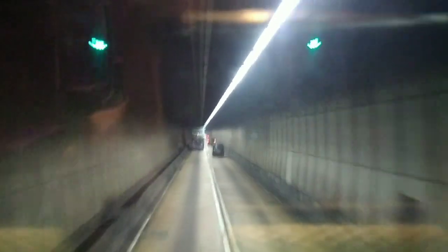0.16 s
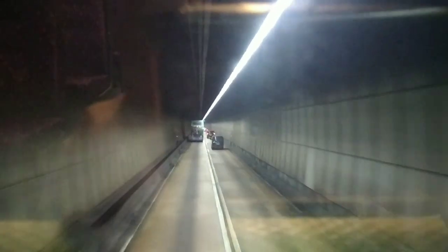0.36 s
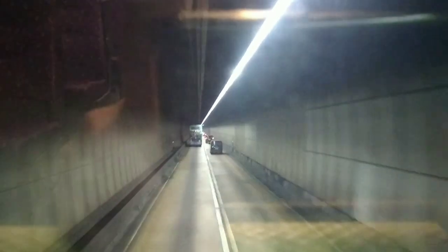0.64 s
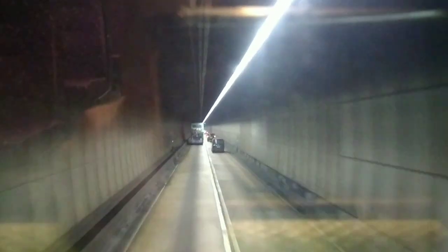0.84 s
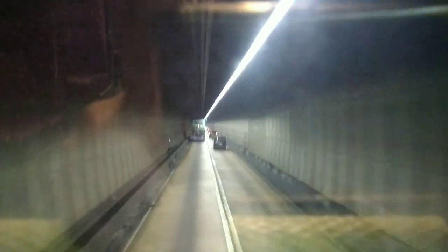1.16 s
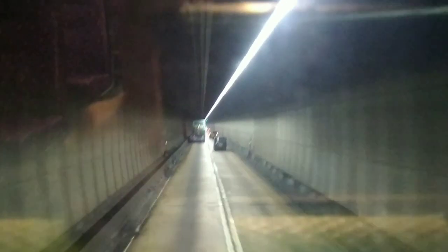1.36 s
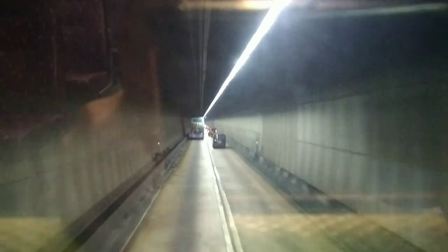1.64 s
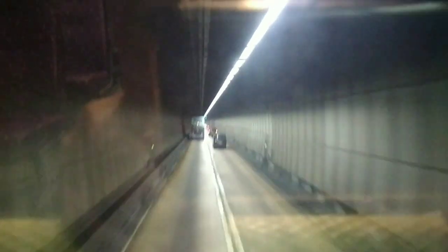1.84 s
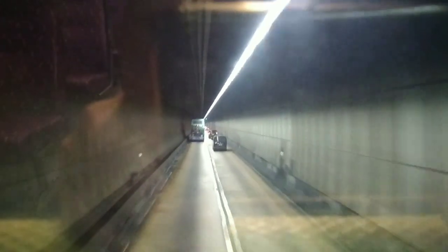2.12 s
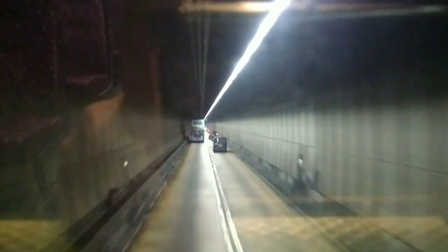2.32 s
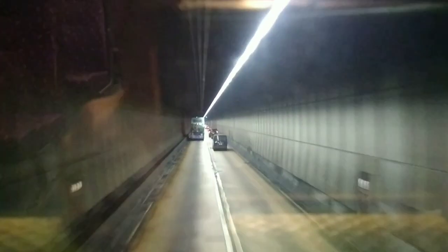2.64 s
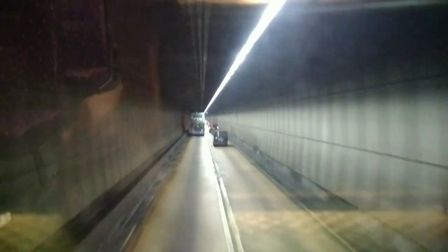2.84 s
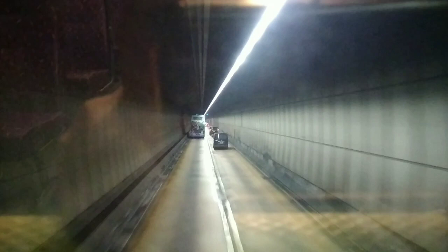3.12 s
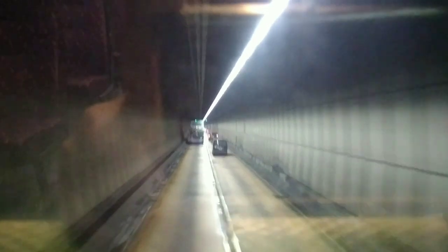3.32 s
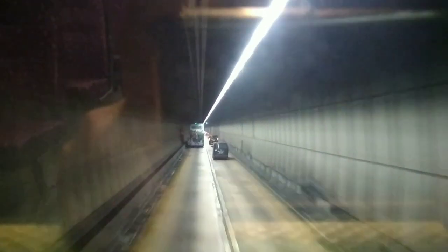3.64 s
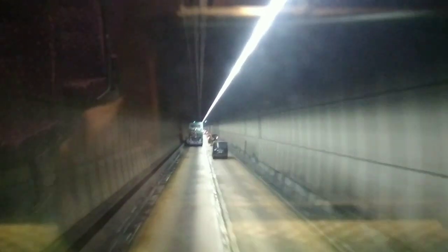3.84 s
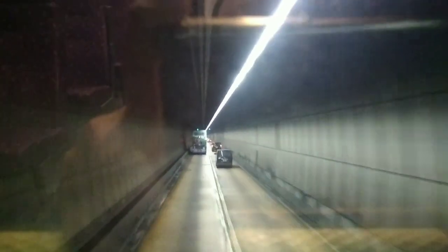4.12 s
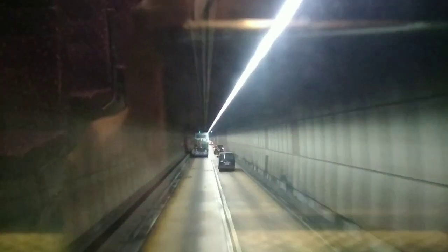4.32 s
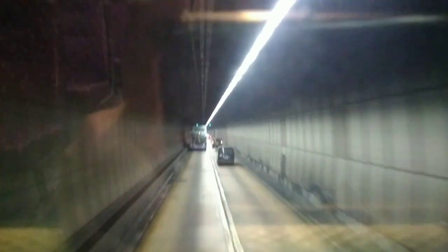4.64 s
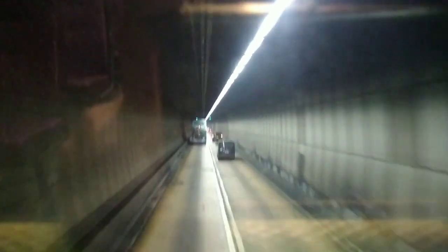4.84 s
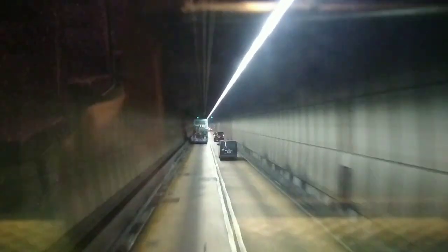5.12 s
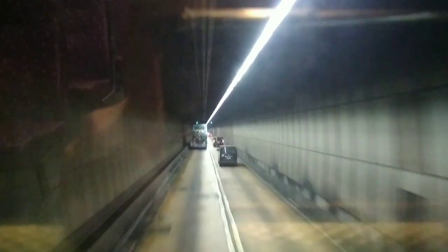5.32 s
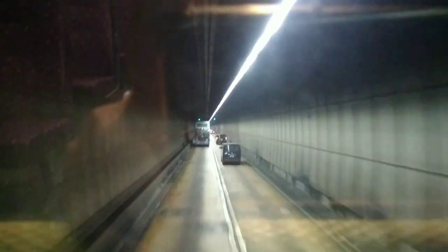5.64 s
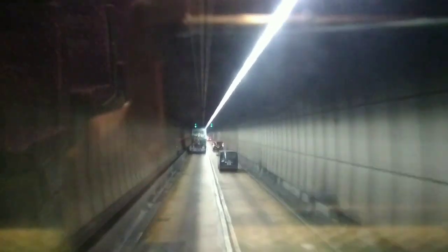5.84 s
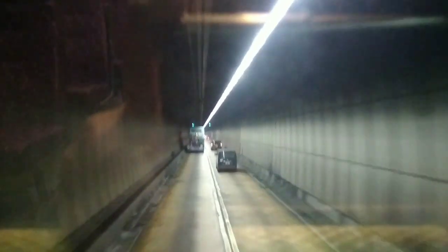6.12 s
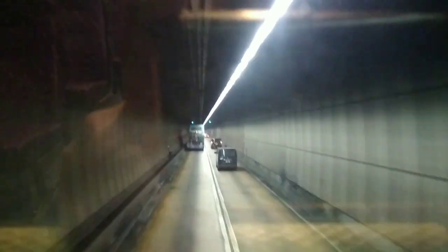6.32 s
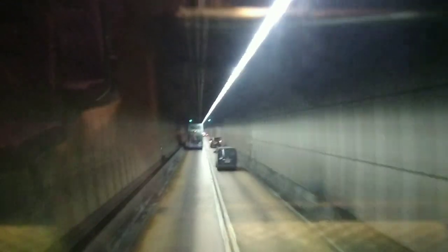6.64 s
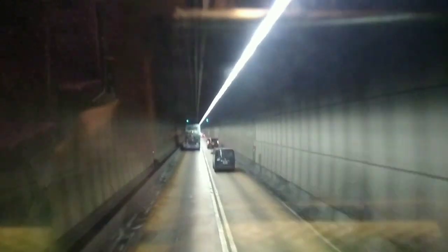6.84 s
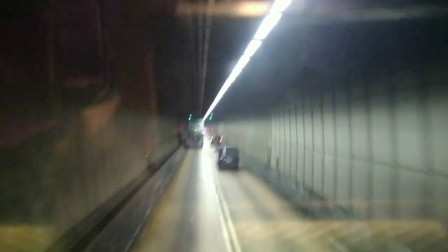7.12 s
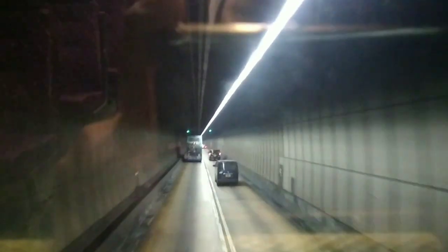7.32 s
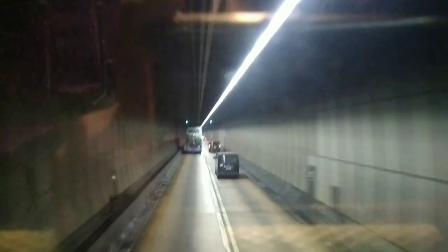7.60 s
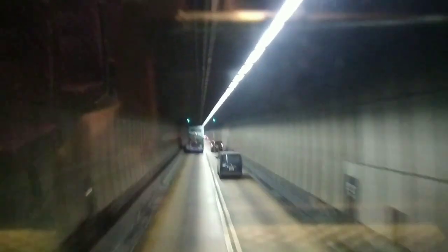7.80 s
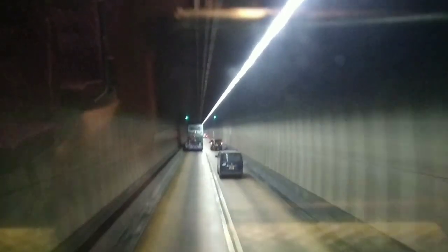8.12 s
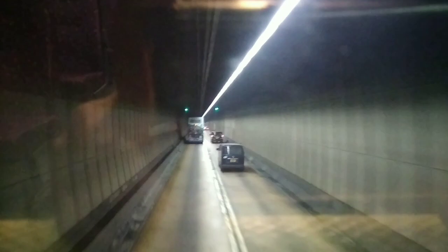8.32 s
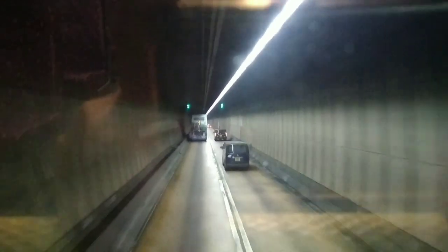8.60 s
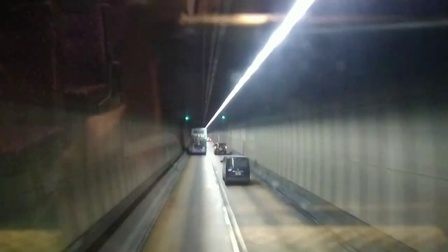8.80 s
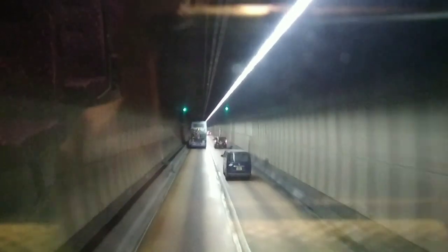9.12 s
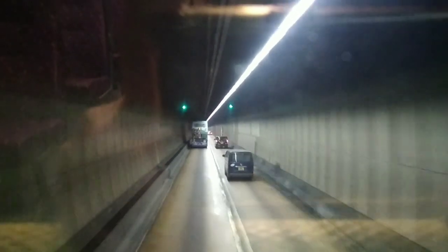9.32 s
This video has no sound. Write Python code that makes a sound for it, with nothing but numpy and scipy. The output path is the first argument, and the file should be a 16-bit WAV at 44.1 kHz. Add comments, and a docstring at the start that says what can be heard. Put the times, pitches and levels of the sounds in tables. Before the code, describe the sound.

Inside a bus driving through a tunnel, heard on a phone in the cabin. A heavy, uneven low rumble and drumming floor dominate, with steady tyre roar and soft air hiss. The low engine pulls at first, then eases off and sinks slightly while thin gear whine drifts in and out. Past the middle, a rough stretch swells the rumble and shakes the trim into a short hissing rattle with ticks and thumps, followed by a small metallic click.

```python
"""Inside a bus in a road tunnel: body sway and boom, drumming floor, tyre roar, air hiss, two steady low hums.
The engine pulls until 3.1 s, then eases off while gears whine; a loose catch clicks at 0.1 s.
From 4.6 s come brief tonal patches in the roar. At 6.3-7.0 s a rough stretch shakes the fittings into a
hissing rattle with ticks and thumps; the catch clicks again at 7.9 s. Shaped noise makes the road, rattle and
ticks, sines make engine, gears, hums and rings; a phone with two small ports hears it."""
import sys
import numpy as np
from scipy import signal
from scipy.fft import rfft, irfft
from scipy.io import wavfile
from scipy.ndimage import uniform_filter1d, minimum_filter1d

SR = 44100
rng = np.random.default_rng(int(sys.argv[2]) if len(sys.argv) > 2 else 0)


def store_wav(level_fs):
    """Save 16-bit WAV to argv[1]."""
    pcm = np.round(np.clip(np.atleast_2d(level_fs), -1, 1) * 32767)
    wavfile.write(sys.argv[1], SR, pcm.T.astype(np.int16))


N = 417186
TIME, FREQ = np.arange(N) / SR, np.arange(N // 2 + 1) * SR / N

# Source levels are dB re full scale ahead of the ports; noise spectra are relative.
# crankshaft speed: t/s, turns per second/Hz
SHAFT_SPEED = [(0, 30.92), (.6, 31.29), (1.4, 31.62), (2.2, 31.86), (3.1, 32.03), (3.8, 31.57),
               (4.6, 31.16), (5.6, 30.72), (7.7, 29.73), (8.6, 29.32), (9.46, 29.03)]
LIFT_OFF_S = 3.1  # the driver lifts off the throttle


def road():
    """Body sways, cabin booms, floor panels drum; tyre roar and air hiss come through the glass."""
    # spectra: f/Hz, level/dB
    sway_spectrum = [(4, -40), (8, -8), (11.5, 11), (16, 11), (21, -1), (27, -18), (36, -53)]
    boom_spectrum = [(18, -9.5), (25, 3.5), (31, -2.5), (36, -1), (41, -16), (50, -17), (70, -26)]
    drum_spectrum = [(30, -12), (48, 4.5), (70, -2), (95, 0), (118, -0.5), (143, -14), (165, -9),
                     (230, -10.5), (280, -19), (325, -13), (450, -17), (900, -35)]
    judder_spectrum = [(110, 3.5), (170, 5.5), (230, -2), (400, -6.5), (600, -7.5), (1200, -13.5)]
    roar_spectrum = [(150, -23.5), (330, -1.5), (450, -6.5), (600, 3), (740, -4), (900, -3.5), (1050, -9),
                     (1250, -13.5), (1520, -15.5), (1690, -12), (1860, -16.5), (2300, -15), (3500, -31),
                     (7000, -65)]
    air_spectrum = [(800, 4), (2000, -7), (3300, 3), (4300, 1), (6300, -3.5), (8000, -5.5), (10400, -10),
                    (13000, -13), (15500, -20)]
    # answers to the road: smooth level/dB, rough level when fully built up/dB, build-up/s, t60/s
    sway_ride = (-19, -5.5, 1, 1)
    boom_ride = (-24.5, -12.5, 0.8, 1.5)
    drum_ride = (-34, -27, 1.3, 0)
    judder_ride = (-56.5, -38, 0.5, 0.1)
    bump_rise_s, rumble_ceiling = .14, .85  # ceiling of the low rumble, full scale 1
    bump_boom_db, bump_judder_db = -22, -9  # re sway, re thud
    pull_drum_db, pull_judder_db = -37.5, -47.5  # added in power at full engine load
    tyres_db, air_db, roar_db_per_hz = -39.5, -45.5, .18  # last: per turn/s of the shaft above its mean

    heave, thud, load = jolts(1, bump_rise_s), jolts(2, bump_rise_s), throttle()
    sway = even(diffuse(sway_spectrum), .18) * ride(sway_ride, heave)
    boom = even(diffuse(boom_spectrum), .242) * ride(boom_ride, heave * undb(bump_boom_db))
    # soft saturation rounds off the largest low-frequency swings
    rumble = rumble_ceiling * np.tanh((sway + boom) / rumble_ceiling)

    drum_level = np.hypot(ride(drum_ride, thud), load * undb(pull_drum_db))
    drum = even(diffuse(drum_spectrum), .28) * drum_level
    judder_road = ride(judder_ride, thud * undb(bump_judder_db))
    judder = diffuse(judder_spectrum) * np.hypot(judder_road, load * undb(pull_judder_db))

    # road speed follows the shaft in this gear
    faster_hz = curve(SHAFT_SPEED) - curve(SHAFT_SPEED).mean()
    roar = diffuse(roar_spectrum) * undb(tyres_db + roar_db_per_hz * faster_hz + .5 * walk(10))
    air = diffuse(air_spectrum) * undb(air_db + .5 * walk(23))
    return rumble + drum + judder + roar + air


def fittings():
    """Trim and panels chatter in many tiny contacts, which the cabin smears into a hiss."""
    # rattle spectrum: f/Hz, level/dB
    rattle_spectrum = [(600, -28), (1400, 1.5), (2600, 3), (4000, 4), (6000, 3.5), (8000, 1), (10400, -1.5),
                       (13000, -4.5), (15500, -3.5)]
    # answer to the road: smooth level/dB, rough level when fully built up/dB, build-up/s, t60/s
    rattle_ride = (-62.5, -41.5, 0.05, 1.4)
    # knocks: t/s, level/dB, rise/s, ring f/Hz
    knocks = [(6.335, -41, 0.021, 12000), (6.345, -45, .018, 2600), (6.398, -38.5, 0.024, 5500),
              (6.512, -37.5, .03, 4200), (6.555, -39, .028, 4800), (6.603, -42, .022, 3200),
              (6.68, -42, .028, 10500), (6.742, -37.5, .022, 5800), (6.825, -37.5, 0.028, 6300),
              (6.905, -36, 0.026, 2400), (6.922, -36.5, 0.026, 5500), (7.038, -46, .02, 3600)]
    contacts_per_s, smear_s, bump_rise_s = 820, .008, .22
    flutter_db, flutter_hz = .6, 13  # spread and rate scale of the random surges

    hits = rng.random(N) < contacts_per_s / SR
    contacts = hits * undb(2 * rng.exponential(size=N))
    power = signal.lfilter([1], [1, -np.exp(-1 / (smear_s * SR))], contacts)
    chatter = np.sqrt(power / power.mean())
    rattle = diffuse(rattle_spectrum) * chatter * ride(rattle_ride, jolts(-1, bump_rise_s))
    out = rattle * undb(flutter_db * walk(flutter_hz))
    for start, db, rise, hz in knocks:
        # a harder jolt sets off a short flurry of contacts in one fitting
        b, a = signal.iirpeak(hz, 1.1, fs=SR)
        ring = signal.lfilter(b, a, rng.standard_normal((2, N)))
        out = out + ring / ring.std() * undb(db) * swell(start, rise)
    return out


def panels():
    """The hardest jolts knock single panels, which give a dull, unsteady ring."""
    # thumps: t/s, level before the soft onset/dB, t60/s, ring f/Hz
    thumps = [(.04, -16, .45, 58.5), (1.29, -14, 0.4, 41), (2.52, -26, .45, 134), (3.52, -25, 0.76, 99.1),
              (5.65, -21, .4, 58), (6.145, -22, 0.51, 101), (6.42, -25, .5, 112.3), (6.5, -33, 0.65, 306),
              (6.57, -28, 0.4, 204.6), (6.705, -27, .2, 395), (6.83, -34, 0.22, 305),
              (6.895, -26, 0.16, 170), (6.95, -20, .22, 62), (7.015, -26.5, 0.13, 345),
              (7.845, -19.5, 0.42, 79), (7.93, -28, 0.25, 200.3)]
    pitch_spread, onset_t60_s = .06, .042  # share of the pitch; time for a panel to give way fully
    out, unsteady = np.zeros(N), 1 + pitch_spread * walk(45)
    for start, db, t60, hz in thumps:
        phase = 2 * np.pi * (np.cumsum(hz * unsteady) / SR + rng.random())
        onset = (1 - fade(start, onset_t60_s)) ** 2
        out += undb(db) * fade(start, t60) * onset * np.sin(phase)
    return out


def ticks():
    """Hard trim parts snap together: broadband noise with an instant onset and a short decay."""
    # tick spectrum: f/Hz, level/dB
    tick_spectrum = [(1500, -10), (3000, 5), (6000, -6), (9000, 1), (11500, -3), (15000, -3)]
    # snaps: t/s, level/dB, t60/s
    snaps = [(6.341, -42, 0.075), (6.425, -42, 0.07), (6.539, -39, .04), (6.578, -37, .025),
             (6.828, -41, .05), (6.918, -35, 0.036), (6.939, -33, .04), (7.037, -34, 0.057)]
    return diffuse(tick_spectrum) * sum(undb(db) * fade(start, t60) for start, db, t60 in snaps)


def catch():
    """A small metal catch rings in damped modes; diffuse cabin reflections build up just after."""
    # clicks: t/s, relative level/dB
    clicks = [(0.114, -34.5), (7.9048, -27.5)]
    # modes: f/Hz, relative level/dB, t60/s
    modes = [(5870, 1.5, 0.014), (6340, -7, .07), (6730, -0.5, 0.011), (7400, -12, 0.018),
             (10800, -12, .04)]
    # reflection spectrum: f/Hz, level/dB
    cabin_spectrum = [(1200, -30), (2000, 1), (2500, 6), (4000, 4.5), (6000, 4), (8500, 1.5), (10400, 0),
                      (13000, -3), (15500, 4)]
    cabin_t60_s, build_t60_s, delay_s = .33, .015, .00086
    direct, echoes = np.zeros(N), np.zeros(N)
    for start, db in clicks:
        for hz, mode_db, t60 in modes:
            direct += undb(db + mode_db) * fade(start, t60) * np.sin(2 * np.pi * hz * (TIME - start))
        arrival = start + delay_s
        echoes += undb(db) * (fade(arrival, cabin_t60_s) - fade(arrival, build_t60_s))
    port_gains = np.array([[1], [.6]])
    return undb(2) * direct * port_gains + undb(-2) * echoes * diffuse(cabin_spectrum)


def engine():
    """Engine orders change level as the throttle closes, then all sink slowly; drone and growl ring the cabin."""
    # orders: multiple of shaft rate, coasting level before sinking/dB rms, pulling level/dB rms
    orders = [(1, -34.5, -31.5), (2, -43, -32), (3, -50, -44), (4, -40.5, -47.5), (10, -53.5, -56.5),
              (16, -56, -54)]
    # drone sliding through cabin resonances: t/s, left level/dB rms, right level/dB rms
    drone_levels = [(0, -51, -50), (.5, -45.5, -44), (1.35, -45.5, -43), (2.6, -52, -45.5),
                    (3.3, -52.5, -46.5), (3.55, -45.5, -44), (4.05, -44.5, -42), (5.0, -50, -49),
                    (6.0, -50.5, -49.5), (6.5, -56, -56), (7.25, -59, -58), (7.65, -48, -47),
                    (8.0, -48.5, -48.5), (8.4, -58, -53), (8.75, -49.5, -46), (9.46, -47, -45)]
    # growl, resonant near the top of the pull: t/s, level/dB rms
    growl_levels = [(0, -57), (.3, -48), (.75, -45.5), (2.75, -44.5), (3.05, -53), (4.5, -56), (9.46, -62)]
    drone_order, growl_order, sink_db_per_s = 8, 5, 1.55
    throb_db, throb_hz = 1, 6.2  # spread and rate scale of the random throb
    hz, load = shaft(), throttle()
    sink_db = sink_db_per_s * np.maximum(TIME - LIFT_OFF_S, 0)
    hum = np.zeros(N)
    for order, coast_db, pull_db in orders:
        level_db = coast_db - sink_db + load * (pull_db - coast_db)
        hum += tone(order * hz, throb_db, throb_hz) * undb(level_db)
    drone = tone(drone_order * hz, .5, 2.5) * undb([curve(drone_levels), curve(drone_levels, 2)])
    growl = tone(growl_order * hz, 1, 2.5) * undb(curve(growl_levels))
    return hum + drone + growl


def gears():
    """Meshes whine on the shaft's pitch; each port has its own sound paths, so the whine comes and goes."""
    # main mesh: t/s, left level/dB rms, right level/dB rms
    main_levels = [(0, -60, -64), (1.3, -68, -65), (1.8, -56, -52.5), (2.9, -54, -51), (3.35, -62, -59),
                   (3.6, -57, -46), (4.0, -51, -46.5), (4.3, -57, -58), (4.55, -51.5, -49), (4.9, -53, -56),
                   (5.3, -48.5, -52), (5.75, -57, -46), (6.2, -51, -53), (6.8, -48.5, -52), (7.1, -54, -53),
                   (7.55, -48.5, -54), (7.66, -45, -42.5), (8.05, -54, -41.5), (8.2, -58, -48.5),
                   (8.7, -53, -49.5), (9.05, -46.5, -55), (9.46, -53, -51)]
    # weaker meshes: multiple of shaft rate
    side_orders = [20.95, 26.17, 30.78]
    # weaker meshes: t/s, level of each of the three/dB rms
    side_levels = [(0, -54, -68, -68), (2.0, -59, -71, -70), (2.8, -55, -71, -53), (3.4, -57, -68, -62),
                   (4.25, -50, -66, -54), (4.85, -56, -66, -61), (5.35, -44.5, -66, -57),
                   (5.8, -56, -66, -55), (6.25, -47, -66, -50), (6.7, -57, -62, -58), (7.5, -51, -62, -62),
                   (7.9, -54, -66, -72), (8.2, -54, -53, -66), (8.7, -54, -60, -56), (9.46, -52, -65, -64)]
    main_order, pitch_spread = 28.45, .0007
    hz, ports = shaft(), []
    for port in (1, 2):
        path_hz = hz * (1 + pitch_spread * walk(7.2))
        whine = tone(main_order * path_hz, .8, 6) * undb(curve(main_levels, port))
        for column, order in enumerate(side_orders, start=1):
            whine += tone(order * path_hz, 2, 4) * undb(curve(side_levels, column))
        ports.append(whine)
    return np.array(ports)


def tyre_tones():
    """Brief tonal patches in the tyre roar: gliding sines with unsteady pitch."""
    # patches: t/s, length/s, starting f/Hz, glide/(Hz/s), level at mid-length/dB rms
    patches = [(4.57, .17, 678, -60, -44.5), (5.329, .18, 587.5, -160, -45), (5.66, .26, 857, 135, -46),
               (6.1, .22, 620, 70, -46), (8.33, .25, 758, 30, -45.5), (9.18, .35, 755, 0, -49)]
    pitch_spread = .007
    out, unsteady = np.zeros(N), 1 + pitch_spread * walk(21.3)
    for start, length, first_hz, glide, db in patches:
        hz = first_hz + glide * np.clip(TIME - start, 0, length)
        arch = np.sin(np.pi * np.clip((TIME - start) / length, 0, 1))
        phase = 2 * np.pi * (np.cumsum(hz * unsteady) / SR + rng.random())
        out += undb(db) * arch * np.sqrt(2) * np.sin(phase)
    return out


def low_hums():
    """Two steady low hums near 115 and 172 Hz; the upper one swells late."""
    # hums: t/s, lower level/dB rms, upper level/dB rms
    hum_levels = [(0, -52, -56), (4.3, -42, -68), (7.6, -44, -51), (8.1, -49, -45.5), (8.75, -46.5, -54),
                  (9.46, -44, -49)]
    base_hz = 57.3 * (1 + .003 * walk(3))
    lower = tone(2 * base_hz, 1.1, 3.1) * undb(curve(hum_levels, 1))
    upper = tone(3 * base_hz, 1.1, 3.1) * undb(curve(hum_levels, 2))
    return lower + upper


def shaft():
    """Crankshaft turns per second, never quite steady."""
    return curve(SHAFT_SPEED) * (1 + .0004 * walk(4))


def throttle():
    """Engine load: 1 while pulling, falling linearly to 0 after lift-off."""
    fall_s = .98
    return np.clip(1 - (TIME - LIFT_OFF_S) / fall_s, 0, 1)


def ride(part, bumps):
    """Shaking strength of one part: smooth road, rough stretch and bumps add in power."""
    rough_from_s, rough_to_s = 6.297, 7.027
    smooth_db, rough_db, build_s, t60_s = part
    build = np.clip((TIME - rough_from_s) / build_s, 0, 1)
    # t60 of 0 stops at once
    stretch = build * np.where(TIME < rough_to_s, 1, fade(rough_to_s, t60_s) ** 2)
    return np.sqrt(undb(smooth_db) ** 2 + undb(rough_db) ** 2 * stretch + bumps ** 2)


def jolts(column, rise_s):
    """Summed swells that the road bumps give to one part."""
    # bumps: t/s, body sway level/dB, floor thud level/dB, fittings rattle level/dB
    bump_rows = [(.17, -14, -44, -49.5), (1.17, -18.5, -36.5, -52), (2.38, -18.5, -42, -57),
                 (3.33, -12, -34.5, -54), (4.57, -13.5, -53, -50.5), (5.88, -13, -37, -53),
                 (7.471, -15, -38, -51.5), (7.82, -15, -34, -62), (8.02, -25, -42, -55.5),
                 (8.73, -19.5, -54, -74), (9.3, -13.5, -37, -56)]
    return sum(undb(bump[column]) * swell(bump[0], rise_s) for bump in bump_rows)


def undb(db):
    """Decibels to gain."""
    return 10 ** (np.asarray(db) / 20)


def curve(rows, column=1):
    """One column of a time table, interpolated at every sample."""
    rows = np.array(rows, float)
    return np.interp(TIME, rows[:, 0], rows[:, column])


def response(points, column=1):
    """Gain at every FFT bin, dB interpolated over log frequency."""
    points = np.array(points, float)
    log_hz = np.log(np.maximum(FREQ, 1))
    return undb(np.interp(log_hz, np.log(points[:, 0]), points[:, column]))


def walk(rate_hz):
    """Slow random drift of spread 1: noise under a Gaussian low-pass."""
    drift = irfft(rfft(rng.standard_normal(N)) * np.exp(-(FREQ / rate_hz) ** 2), N)
    return drift / drift.std()


def diffuse(points):
    """Noise from all sides: long waves reach both ports alike, short ones do not."""
    port_gap_m, sound_m_per_s = .17, 343
    alike = np.sinc(2 * np.maximum(FREQ, 1) * port_gap_m / sound_m_per_s)
    # 12 dB/octave beyond either end of the spectrum
    ends = np.minimum(FREQ / points[0][0], 1) ** 2 / np.maximum(FREQ / points[-1][0], 1) ** 2
    mid, side = rfft(rng.standard_normal((2, N))) * response(points) * ends
    mid = irfft(mid, N)
    side = irfft(side * np.sqrt((1 - alike) / (1 + alike)), N)
    return np.array([mid + side, mid - side]) / mid.std()


def even(x, seconds):
    """Hold a noise at constant rms over a moving window."""
    return x / np.sqrt(uniform_filter1d(x.mean(axis=0) ** 2, int(seconds * SR)))


def fade(start, t60):
    """Envelope that jumps to 1 and decays 60 dB in t60 seconds."""
    return (TIME >= start) * undb(-60 * np.maximum(TIME - start, 0) / t60)


def swell(start, rise_s):
    """Envelope that climbs to 1 over the rise time and sinks back."""
    age = np.maximum(TIME - start, 0) / rise_s
    return (age * np.exp(1 - age)) ** 2


def tone(hz, waver_db, waver_hz):
    """Sine of nominal rms 1 whose strength wavers at random."""
    phase = 2 * np.pi * (np.cumsum(hz * np.ones(N)) / SR + rng.random())
    return np.sqrt(2) * np.sin(phase) * undb(waver_db * walk(waver_hz))


def limit(sound):
    """Turn the gain down smoothly around any peak above the ceiling."""
    ceiling, hold = .99, int(.04 * SR)  # full scale 1; samples
    gain = ceiling / np.maximum(np.abs(sound).max(axis=0), ceiling)
    return sound * uniform_filter1d(minimum_filter1d(gain, hold), hold)


def scene():
    """Sum of all sources at the two ports."""
    ride_noise = road() + fittings() + panels() + ticks() + catch()
    return ride_noise + engine() + gears() + tyre_tones() + low_hums()


def record(dry):
    """Each port has its own frequency response; peaks are limited and the top is cut."""
    # port responses: f/Hz, left gain/dB, right gain/dB
    port_points = [(96, 1.04, 1.5), (1150, -3, -2.5), (2230, -0.5, -0.5), (3460, -3, -4.5), (5030, 0.5, -8),
                   (6490, 6.5, -6), (7580, -1, -5), (8940, -5, -0.5), (10280, -9, 9), (11700, -6.5, 1),
                   (13500, -4, -5), (15000, -13, -11)]
    top_hz, half = 15150, 512  # half: FIR half-length in samples
    impulses = irfft([response(port_points), response(port_points, 2)], N)
    taps = np.roll(impulses, half, axis=1)[:, :2 * half + 1]
    padded = np.pad(dry, ((0, 0), (half, half)), mode="edge")
    sound = limit(signal.fftconvolve(padded, taps, mode="valid", axes=1))
    low_pass = signal.ellip(8, .2, 70, top_hz, fs=SR, output="sos")
    return signal.sosfilt(low_pass, sound)


dry = scene()
out = record(dry)
store_wav(out)
```